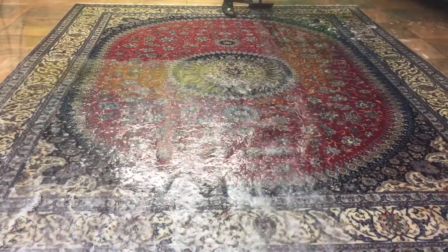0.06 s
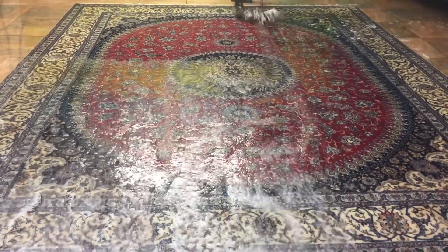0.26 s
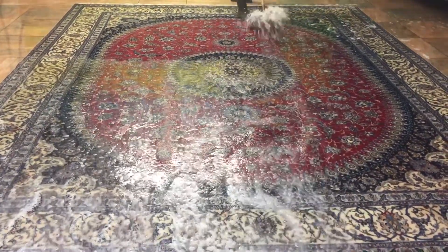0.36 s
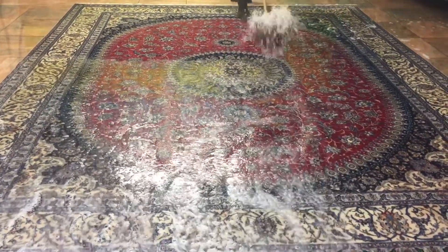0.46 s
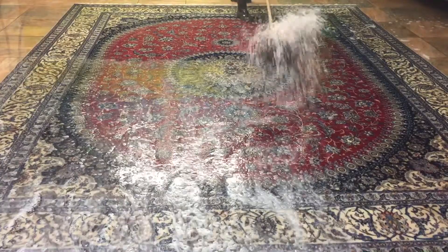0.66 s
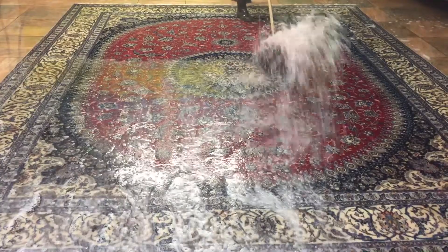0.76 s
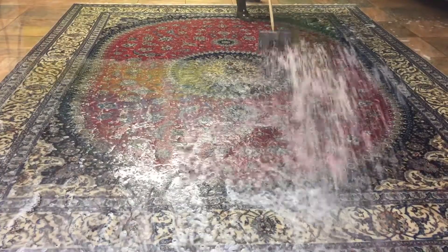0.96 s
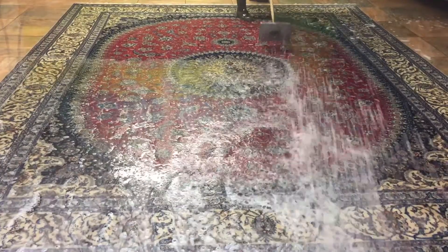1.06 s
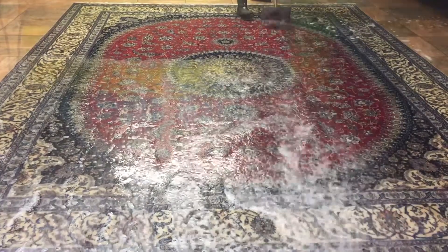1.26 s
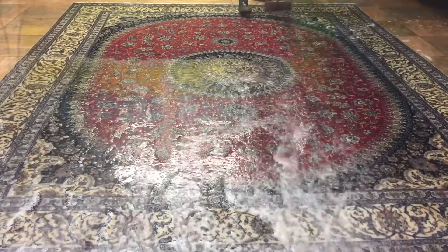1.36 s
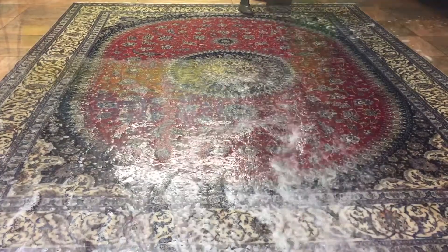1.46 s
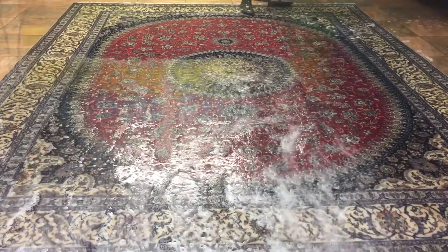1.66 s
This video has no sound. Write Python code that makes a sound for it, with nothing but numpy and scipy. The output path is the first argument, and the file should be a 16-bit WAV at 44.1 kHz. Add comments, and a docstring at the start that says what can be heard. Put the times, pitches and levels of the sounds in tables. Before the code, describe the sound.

In a hard-floored room with a faint hum, a squeegee pushes water across a wet rug with a low, juddering rub. A hissing splash and pattering drops follow, then the blade is drawn softly back.

```python
"""Squeegee across a soaked rug

A floor squeegee is shoved forward: its rubber blade sticks and slips, ringing the head and the hollow
handle, while water churns before it. The wave takes off as fine spray and lands as a bright splash with
a few fat drops, all tiny ringing bubbles and hiss; the blade is then drawn softly back.
The water echoes in a hard-floored workroom with a faint mains hum."""
import sys
import numpy as np
from scipy import signal
from scipy.fft import rfft, irfft, next_fast_len
from scipy.io import wavfile
from scipy.ndimage import uniform_filter1d, map_coordinates

SR = 44100
rng = np.random.default_rng(int(sys.argv[2]) if len(sys.argv) > 2 else 0)


def bounce(signal):
    """Save signal as a 16-bit WAV file at the path given by the first command-line argument."""
    frames = np.transpose(np.atleast_2d(signal))
    limited = np.clip(frames, -1, 1)
    pcm = np.round(limited * 32767).astype(np.int16)
    wavfile.write(sys.argv[1], SR, pcm)


N = 74970

# room tone EQ: f/Hz, gain/dB
ROOM_TONE_EQ = [(25, -20), (48, 11), (110, 6), (250, -9), (1000, -15), (4000, -9), (15000, -47)]
# reverb time of the workroom: f/Hz, T60/s
ROOM_T60 = [(200, 0.64), (2000, 0.43), (6000, 0.27), (13000, 0.13)]
# dull rub of the return stroke: f/Hz, gain/dB
DRAW_BACK_EQ = [(50, 2), (100, -3), (200, 2.5), (480, -5), (720, 2.5), (930, -3.5), (1500, -3.5),
                (2000, -16), (6000, -23), (15000, -36)]

# water churning before the blade: t/s, level/dB
CHURN_ENV = [(.13, -65), (.18, -41), (.27, -40), (.35, -36), (.45, -32), (.61, -36.5), (.72, -36),
             (.85, -49.5), (1.0, -58)]
# its low, frothy body: f/Hz, gain/dB
CHURN_EQ = [(120, -6), (300, 9.5), (800, 4), (1400, -2), (2400, -7), (3500, -6), (6000, -16), (15000, -28)]
# fine spray in the air and on the rug: t/s, level/dB (before SPRAY_BOOST_DB)
SPRAY_ENV = [(0, -53), (.12, -64.5), (.17, -54.5), (.21, -52), (.45, -48.5), (.77, -42.5), (.86, -38.5),
             (.96, -33), (1.0, -33.5), (1.1, -32.5), (1.19, -28), (1.27, -31.5), (1.37, -34), (1.42, -44),
             (1.52, -57), (1.62, -57)]
SPRAY_BOOST_DB = 3
# its airy fizz: f/Hz, gain/dB
SPRAY_EQ = [(500, -11.5), (1500, -2.5), (3000, 1), (6300, 2.5), (9000, 0.5), (10300, -3), (12000, -1.5),
            (15500, -6)]
# the sheet of water lands: t/s, level/dB
SPLASH_ENV = [(.82, -70), (.9, -41), (1.01, -45), (1.07, -29), (1.13, -31), (1.18, -25.5), (1.27, -29.5),
              (1.36, -32.5), (1.42, -36.5), (1.5, -43), (1.66, -61.5)]
# its bright wash: f/Hz, gain/dB
SPLASH_EQ = [(200, -6.5), (600, -18), (1100, -6.5), (1800, -4.5), (2800, 0), (4000, 1), (6000, -0.5),
             (8000, -3.5), (10500, -7.5), (15500, -15)]
# heavier drops land last: t/s, level/dB
PATTER_ENV = [(1.03, -55), (1.08, -34), (1.13, -52), (1.2, -53), (1.27, -29.5), (1.315, -36), (1.36, -30),
              (1.42, -46.5), (1.52, -56)]
# their upper-mid tick: f/Hz, gain/dB
PATTER_EQ = [(400, -27), (1200, -13), (2000, 0.5), (2700, -1.5), (3600, 3), (5000, -2.5), (15000, -32)]
# single fat drops: t/s, peak level/dB, f/Hz (early in the rise), decay/s
FAT_DROPS = [(0.962, -22, 8100, 0.00031), (1.039, -19, 3900, 0.00072), (1.0853, -20.5, 1750, .004),
             (1.2635, -17, 2240, 0.0018), (1.2975, -16.5, 2790, 0.0015), (1.3303, -16.5, 5560, .002),
             (1.3332, -13.5, 5750, 0.0007), (1.35, -12.5, 3000, 0.00053), (1.3626, -21, 3430, 0.00073)]
DROP_NOISE, DROP_ATTACK_S = 0.21, 0.00032
DROP_RISE = .12  # share of its pitch by which a drop's bubble rises per decay time

# the handle rasps as the blade bites: t/s, level/dB, favoured f/Hz
RASP_ENV = [(.14, -54.5, 1400), (.2, -47, 1750), (0.261, -35.5, 2130), (.315, -36.5, 1610),
            (.4, -40.5, 1270), (.6, -43, 1500), (.72, -44, 1720), (.82, -56, 1700)]
RASP_SPAN_OCT = 0.43
# modes of the hollow handle: f/Hz, bandwidth/Hz, gain/dB
HANDLE_MODES = [(1190, 33, -2.5), (1510, 37, -0.5), (1962, 110, 1.5), (2414, 33, 2.5), (2820, 74, -19),
                (3470, 67, -3)]

SLIPS_PER_S, SLIP_RANGE_DB, RUB_GAIN = 170, 5.0, 0.5
# tone of the slips as they drive the head: f/Hz, gain/dB
SLIP_EQ = [(60, -32), (140, -3.5), (200, 0.5), (1000, -1.5), (3000, -18), (15000, -38)]
# judder of the blade: t/s, low ring level/dB, upper ring level/dB
JUDDER_ENV = [(.14, -80, -67), (.182, -57, -55), (.22, -42, -44), (.25, -44, -30), (.28, -39, -25.5),
              (.35, -26, -27.5), (.43, -31, -29.5), (.5, -26, -27), (.57, -24, -24.5), (.61, -25, -24),
              (.665, -22, -30.5), (.72, -32, -33.5), (.79, -34.5, -43.5), (.88, -47, -54)]
# low ring of the squeegee head: f/Hz, bandwidth/Hz, gain/dB
LOW_MODES = [(233, 24, 0), (270, 22, -2), (326, 20, 0), (366, 28, -6)]
# its upper ring, before the bend: f/Hz, bandwidth/Hz, gain/dB
UPPER_MODES = [(470, 60, -17), (535, 32, -7), (587, 34, 0), (670, 36, -16), (892, 40, -14)]
# pressure on the blade bends the upper ring: t/s, f/Hz of its strongest mode
PRESSURE_BEND = [(.23, 585.3), (.28, 576.7), (.35, 547.2), (.42, 560), (0.521, 589), (0.601, 596.5),
                 (0.699, 589.4), (0.799, 570)]
# the blade catches and lurches on: t/s, boost/dB
CATCHES = [(.378, 5), (.408, 5), (.483, 2.5), (0.524, 1.5), (.606, 6.5), (.689, 8), (.725, 6), (0.795, 5.5)]
CATCH_WIDTH_S = 0.0031
# the head rings on after the shove: t/s, level/dB
AFTER_RING_ENV = [(.75, -37.5), (.86, -51), (.928, -37), (.966, -45.5), (.995, -38), (1.06, -43),
                  (1.09, -36), (1.146, -43), (1.172, -35), (1.215, -40), (1.245, -34.5), (1.3, -45),
                  (1.45, -62)]
# modes that linger: f/Hz, bandwidth/Hz, gain/dB
AFTER_MODES = [(223, 47, 8), (291, 67, -5.5)]


def amp(db):
    """Decibels to gain."""
    return 10 ** (np.asarray(db) / 20)


def unit(x):
    """Scale to rms 1."""
    return x / np.sqrt(np.mean(x ** 2) + 1e-20)


def curve_at(points, hz):
    """Read (f/Hz, value) points on a log frequency axis."""
    freqs, values = np.transpose(points)
    return np.interp(np.log(hz + 1), np.log(freqs + 1), values)


def envelopes(rows):
    """One gain envelope per dB column, fading at 140 dB/s outside the rows."""
    times, *columns = np.transpose(rows)
    t = np.arange(N) / SR
    outside_s = np.abs(t - np.clip(t, times[0], times[-1]))
    return [amp(np.interp(t, times, db) - 140 * outside_s) for db in columns]


def wobble(rate):
    """A smooth random curve, rate knots a second."""
    return map_coordinates(rng.standard_normal(1024), [np.arange(N) * rate / SR], mode="wrap")


def filtered(x, response):
    """Apply a frequency response to x."""
    size = next_fast_len(N + SR // 2)
    return irfft(rfft(x, size) * response(np.fft.rfftfreq(size, 1 / SR)), size)[:N]


def equalised(x, eq):
    """x through an EQ curve, at rms 1."""
    return unit(filtered(x, lambda hz: amp(curve_at(eq, hz))))


def ringing(x, modes):
    """x through resonators of alternating polarity, levelled to a steady rms of 1."""
    def response(f):
        return sum((-1) ** k * amp(db) * 1j * f * width / (hz * hz - f * f + 1j * f * width)
                   for k, (hz, width, db) in enumerate(modes))
    ring = filtered(x, response)
    power = uniform_filter1d(uniform_filter1d(ring ** 2, size=1300), size=1300)
    return ring / np.sqrt(np.abs(power) + 1e-20)


def droplets(count, centre_hz, spread, cycles, scatter_db):
    """A cloud of tiny bubbles: damped sines of random size that rise a little in pitch."""
    when, pitch_draw, size_draw, decay_draw = rng.random((count, 4)).T[:, :, None]
    hz = np.clip(centre_hz * (pitch_draw / (1 - pitch_draw)) ** spread, 500, 15000)
    size = amp(-scatter_db * np.log(.02 + size_draw))
    k = np.arange(256)
    turns = hz * k / SR
    age = turns / (cycles * (.5 + decay_draw))  # in decay times
    chirp = np.sin(2 * np.pi * turns * (1 + 0.0067 * np.minimum(age, 5)))
    grains = size * np.sqrt(hz) * np.exp(-age) * chirp * (1 - k / len(k))
    positions = (when * N).astype(int) + k
    return unit(np.bincount(positions.ravel(), grains.ravel(), N)[:N])


def water(drops, eq, hiss_db, flutter_db):
    """Droplets over the hiss of countless smaller ones, with a fast flutter in level."""
    texture = drops + amp(hiss_db) * rng.standard_normal(N)
    return equalised(texture * amp(flutter_db * wobble(160)), eq)


def clumps(count, decay_s, depth):
    """Envelope of water landing in little bursts: instant attack, quick decay."""
    when, size_draw = rng.random((count, 2)).T
    hits = np.bincount((when * N).astype(int), -np.log(.05 + .95 * size_draw), N)
    bursts = signal.lfilter([1], [1, -np.exp(-1 / (decay_s * SR))], hits)
    return np.sqrt(1 + depth * bursts)


def room_tone(hum_hz=99.5, hum_db=-53.5, noise_db=-55):
    """The bed: mains hum over quiet room noise."""
    hum = np.sqrt(2) * np.sin(2 * np.pi * hum_hz * np.arange(N) / SR)
    return amp(hum_db) * hum + amp(noise_db) * equalised(rng.standard_normal(N), ROOM_TONE_EQ)


def reverb(x, stretches=24, send_db=-10):
    """The room's diffuse tail, shorter in the treble; drawn afresh per stretch to stay unpitched."""
    hz, t, spectra = signal.stft(rng.standard_normal((stretches, SR // 2)), SR, nperseg=256)
    decay = amp(-60 * t / curve_at(ROOM_T60, hz)[:, None])
    tails = signal.istft(spectra * decay, SR, nperseg=256)[1]
    out = np.zeros(2 * N)
    for part, tail in zip(np.array_split(np.arange(N), stretches), tails):
        echo = signal.fftconvolve(x[part], tail / np.linalg.norm(tail))
        out[part[0] + SR // 200:][:len(echo)] += echo  # 5 ms pre-delay
    return amp(send_db) * out[:N]


def draw_back(start_s=1.501, attack_s=0.039, fade_after_s=0.088, fade_db_per_s=81, level_db=-42.5):
    """A soft, dull rub as the blade is pulled back."""
    t = np.arange(N) / SR - start_s
    envelope = np.clip(t / attack_s, 0, 1) * amp(-fade_db_per_s * np.maximum(t - fade_after_s, 0))
    return amp(level_db) * envelope * equalised(rng.standard_normal(N), DRAW_BACK_EQ)


def churn():
    """Water froths in front of the moving blade."""
    drops = droplets(count=3500, centre_hz=2245, spread=0.398, cycles=1.9, scatter_db=0)
    return envelopes(CHURN_ENV)[0] * water(drops, CHURN_EQ, hiss_db=6.0, flutter_db=-0.6)


def spray():
    """Fine drops crackle, loudest as the wave flies and lands."""
    drops = droplets(count=6000, centre_hz=7540, spread=0.365, cycles=1.9, scatter_db=2.0)
    fizz = water(drops, SPRAY_EQ, hiss_db=3.5, flutter_db=1.0)
    fizz *= clumps(count=200, decay_s=.002, depth=1.0)
    return amp(SPRAY_BOOST_DB) * envelopes(SPRAY_ENV)[0] * unit(fizz)


def splash():
    """The thrown sheet of water breaks on the wet pile."""
    drops = droplets(count=5000, centre_hz=3650, spread=0.374, cycles=1.8, scatter_db=4.5)
    wash = water(drops, SPLASH_EQ, hiss_db=3.5, flutter_db=.5)
    wash *= clumps(count=220, decay_s=0.0017, depth=0.67)
    return envelopes(SPLASH_ENV)[0] * unit(wash)


def patter():
    """Bigger, duller drops patter down after the sheet."""
    drops = droplets(count=1500, centre_hz=2670, spread=0.21, cycles=2.2, scatter_db=2.5)
    return envelopes(PATTER_ENV)[0] * water(drops, PATTER_EQ, hiss_db=-3, flutter_db=2.5)


def fat_drops():
    """Single large drops smack, each with a very short, rising bubble ring."""
    out, t = np.zeros(N + SR), np.arange(SR // 20) / SR
    for start_s, db, hz, decay_s in FAT_DROPS:
        pitch = hz * (1 + DROP_RISE * (np.minimum(t / decay_s, 4) - .5))
        ring = np.sin(2 * np.pi * np.cumsum(pitch) / SR) + DROP_NOISE * rng.standard_normal(len(t))
        smack = ring * np.exp(-t / decay_s) * (1 - np.exp(-t / DROP_ATTACK_S))
        out[round(start_s * SR):][:len(t)] += amp(db) * smack / np.abs(smack).max()
    return out[:N]


def stick_slip():
    """The rubber sticks and slips at an uneven rate, rubbing in between."""
    gap_draw, force_draw = rng.random((1000, 2)).T
    onsets = (np.cumsum(.2 + 1.6 * gap_draw) * SR / SLIPS_PER_S).astype(int)
    kicks = np.bincount(onsets, amp(SLIP_RANGE_DB * force_draw), N)[:N]
    return unit(kicks - kicks.mean()) + RUB_GAIN * rng.standard_normal(N)


def handle_rasp():
    """The blade's bite rings the handle's modes, favouring the high ones while it skids fastest."""
    times, _, pitches = np.transpose(RASP_ENV)
    favoured_hz = np.interp(np.arange(N) / SR, times, pitches)
    drive = stick_slip()
    rings = np.zeros(N)
    for hz, width, db in HANDLE_MODES:
        focus = 1 / (1 + (np.log2(hz / favoured_hz) / RASP_SPAN_OCT) ** 2)
        rings += amp(db) * focus * ringing(drive, [(hz, width, 0)])
    return envelopes([row[:2] for row in RASP_ENV])[0] * unit(rings)


def blade_judder():
    """Slips ring the squeegee head into a bending groan; a low ring lingers after the shove."""
    t = np.arange(N) / SR
    low_env, upper_env = envelopes(JUDDER_ENV)
    lurch = amp(sum(db * np.exp(-.5 * ((t - at_s) / CATCH_WIDTH_S) ** 2) for at_s, db in CATCHES))
    drive = equalised(stick_slip(), SLIP_EQ)
    speed = np.interp(t, *np.transpose(PRESSURE_BEND)) / UPPER_MODES[2][0]
    groan = map_coordinates(ringing(drive, UPPER_MODES), [np.cumsum(speed)], mode="mirror")  # varispeed
    body = ringing(drive, LOW_MODES)
    after_ring = envelopes(AFTER_RING_ENV)[0] * ringing(drive, AFTER_MODES)
    return lurch * (low_env * body + upper_env * groan) + after_ring


def scene():
    """One shove of the squeegee, in mono; only the water and the return stroke feed the reverb."""
    wet_rug = churn() + spray() + splash() + patter() + fat_drops() + draw_back()
    squeegee = blade_judder() + handle_rasp()
    return (squeegee + wet_rug + reverb(wet_rug) + room_tone())[None]


def record(dry):
    """Master EQ: a low cut on the deepest bass and a brick wall on the very top."""
    low_cut_hz, top_hz = 53, 15900
    return filtered(dry[0], lambda hz: (hz < top_hz) * (1 - 1 / (1 + (hz / low_cut_hz) ** 4)))[None]


dry = scene()
out = record(dry)
bounce(out)
```